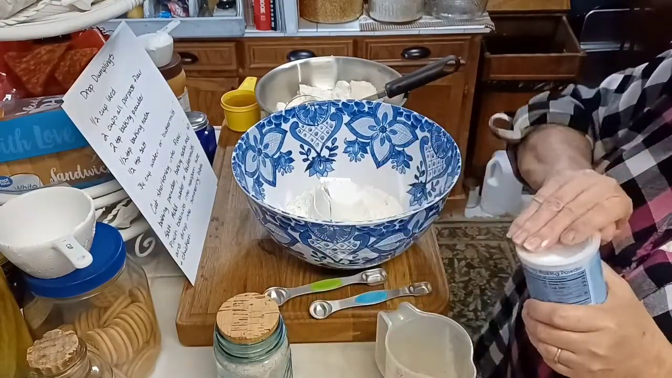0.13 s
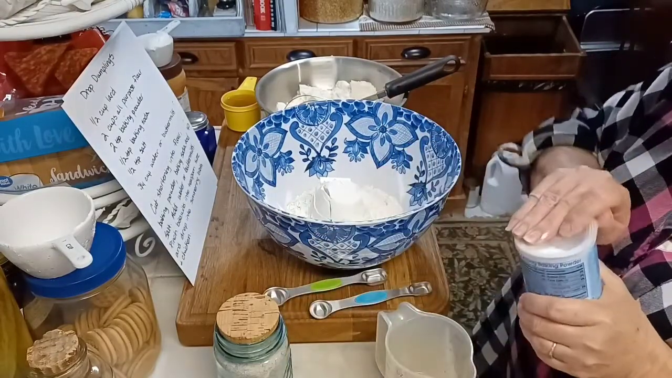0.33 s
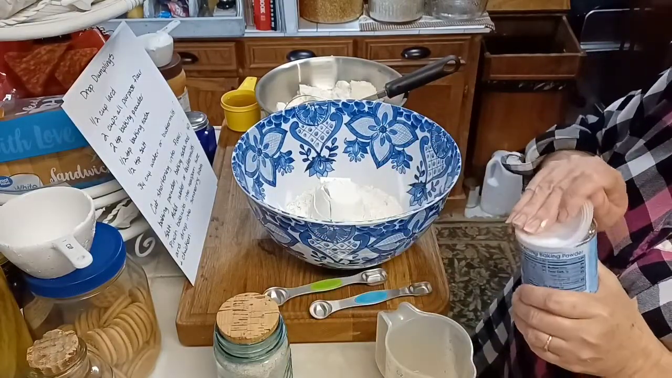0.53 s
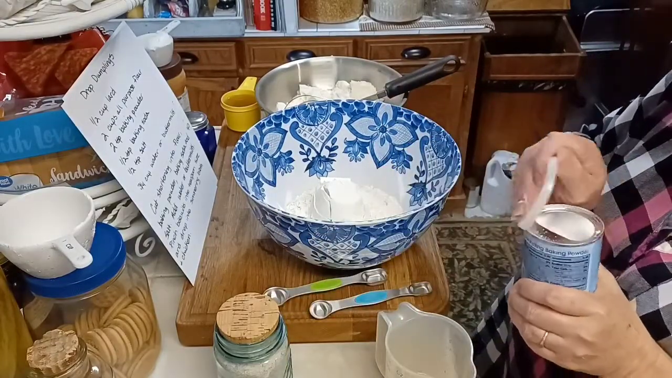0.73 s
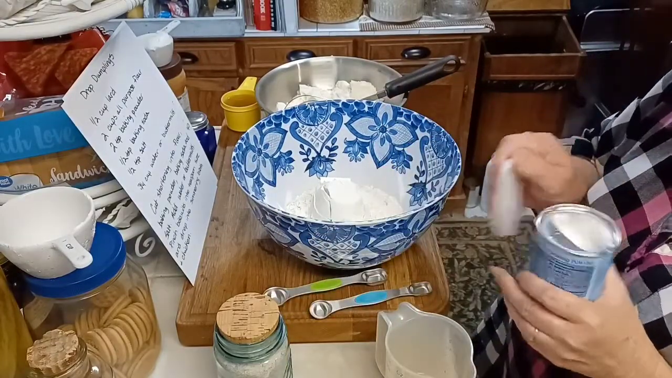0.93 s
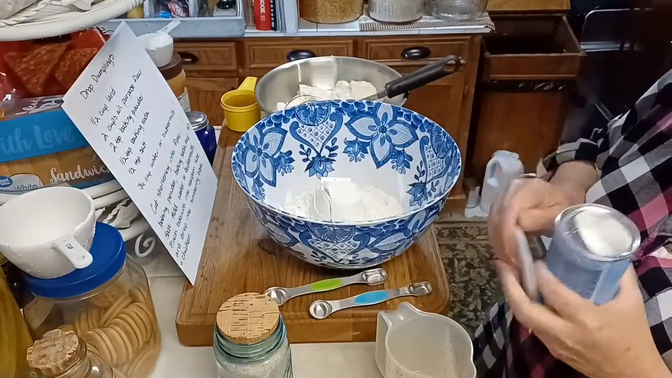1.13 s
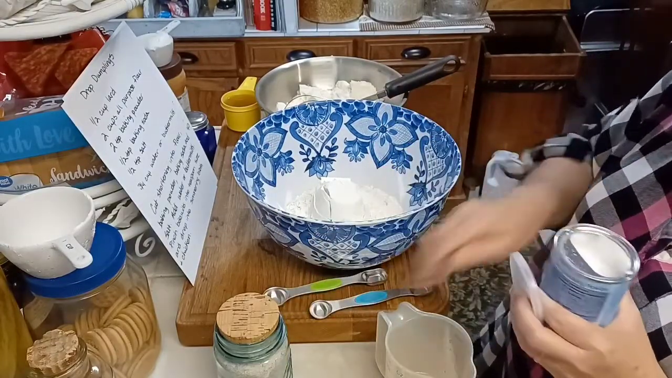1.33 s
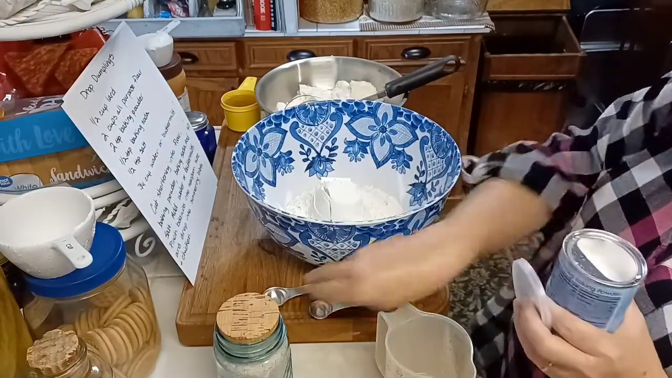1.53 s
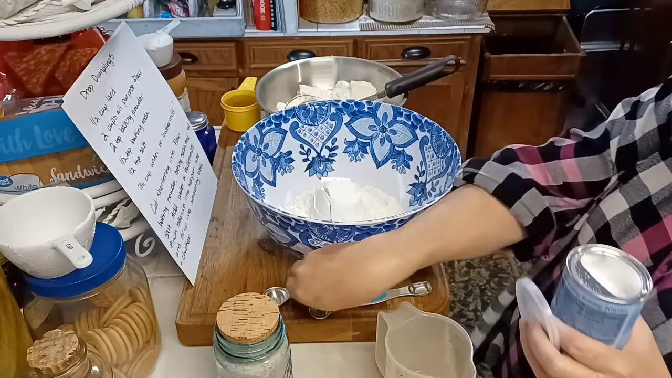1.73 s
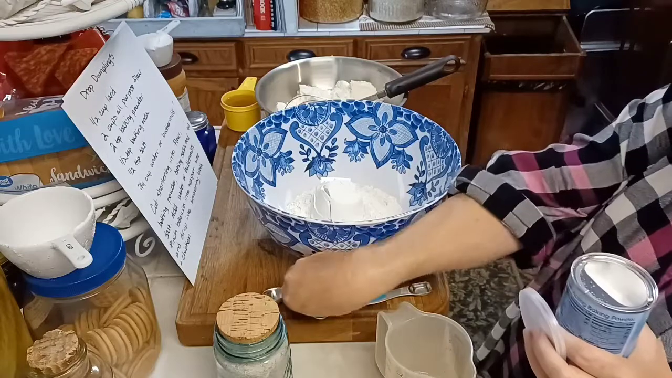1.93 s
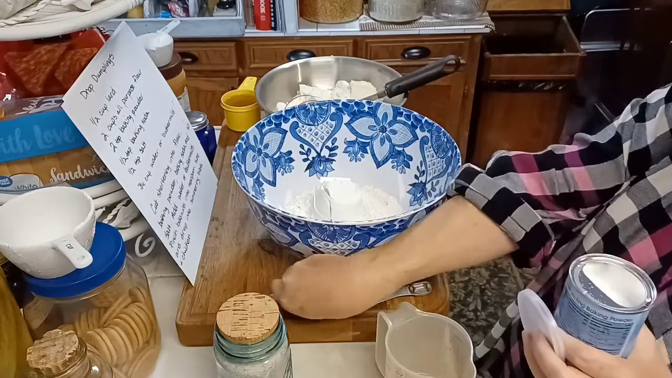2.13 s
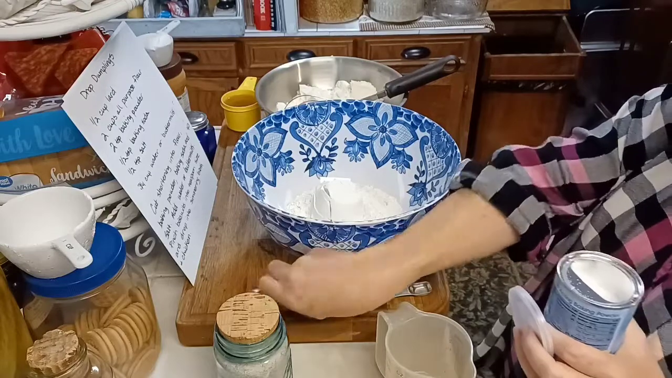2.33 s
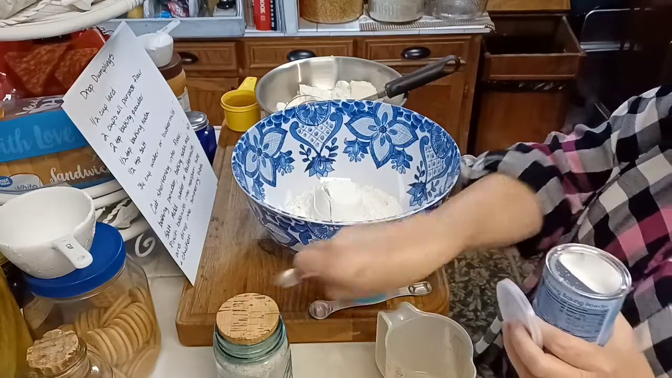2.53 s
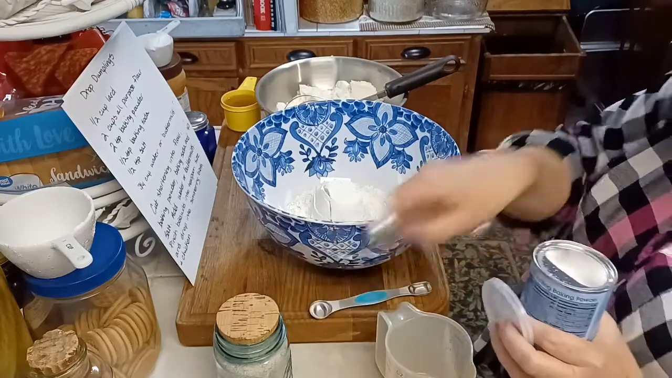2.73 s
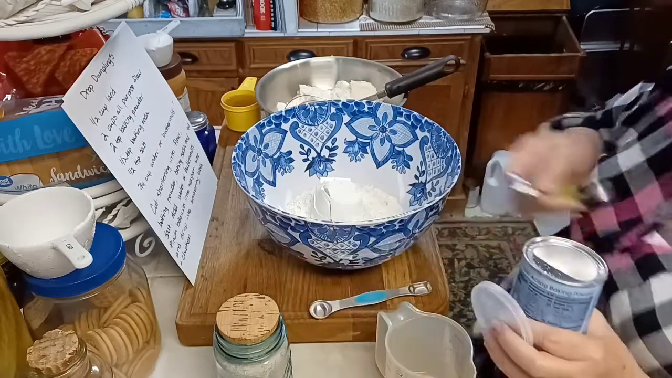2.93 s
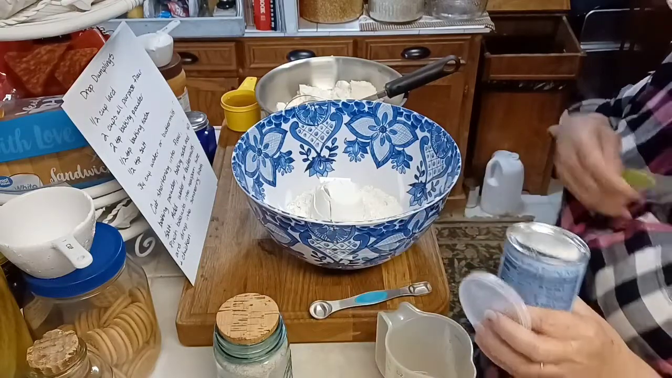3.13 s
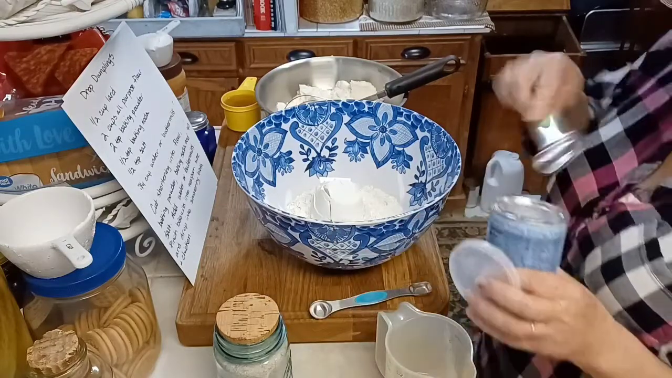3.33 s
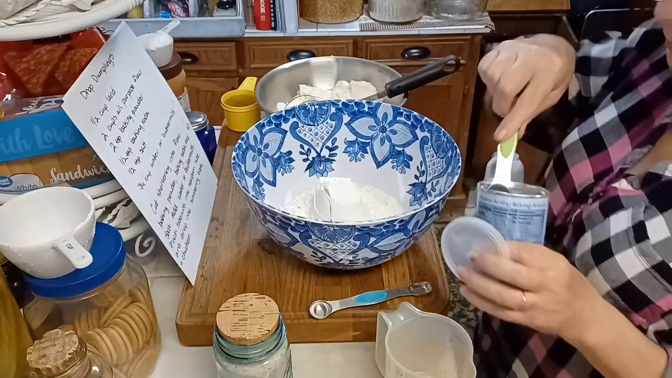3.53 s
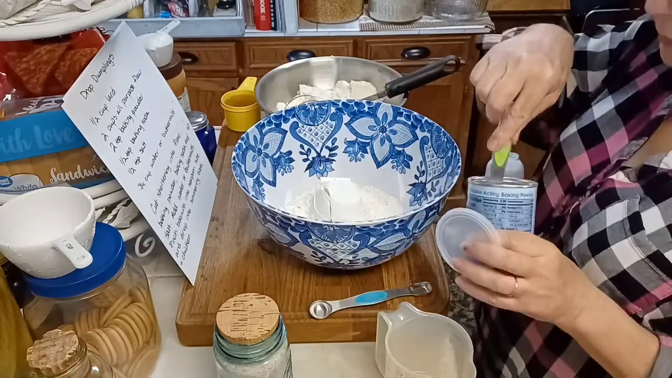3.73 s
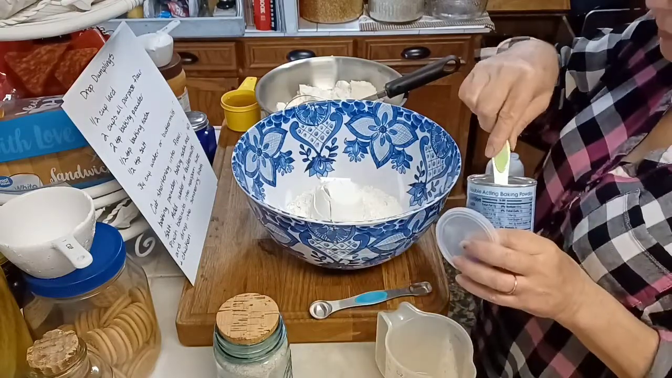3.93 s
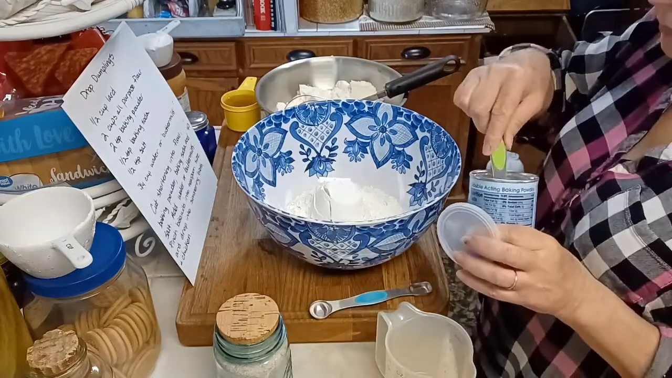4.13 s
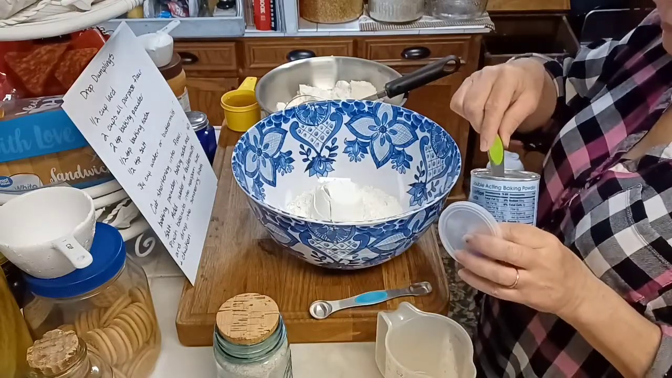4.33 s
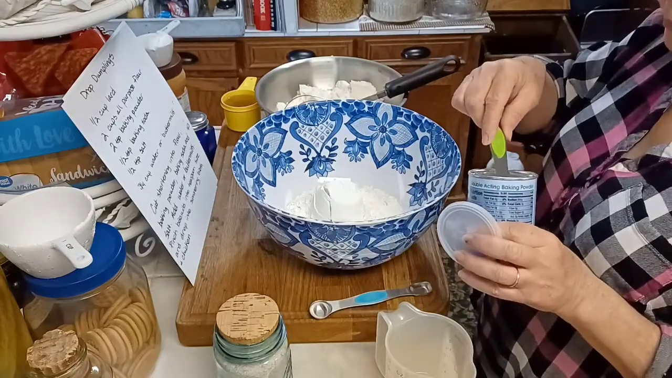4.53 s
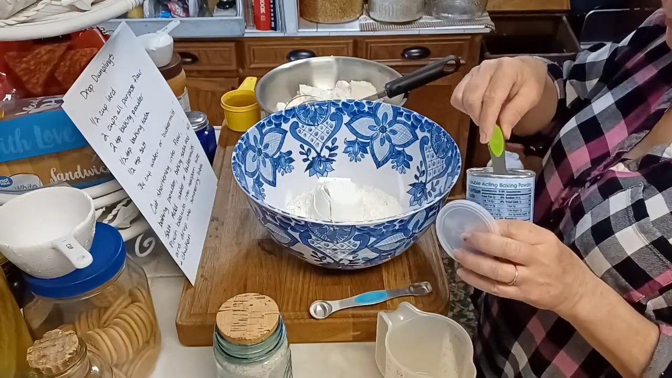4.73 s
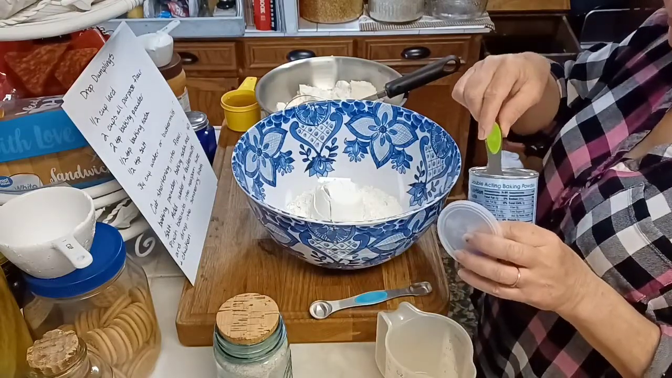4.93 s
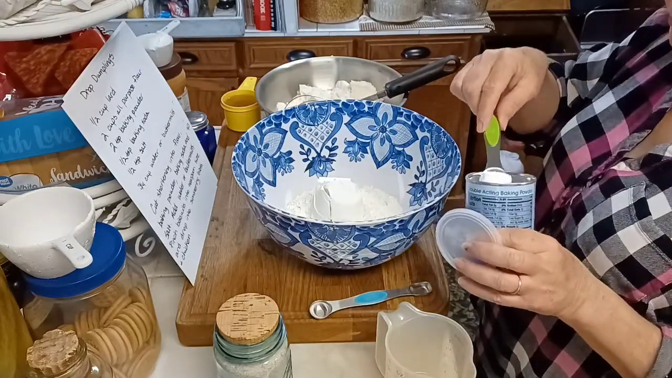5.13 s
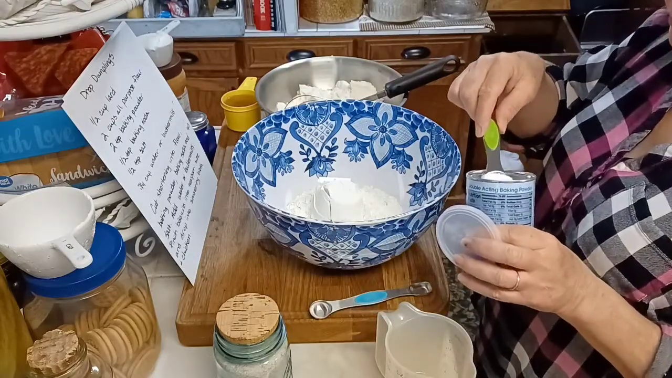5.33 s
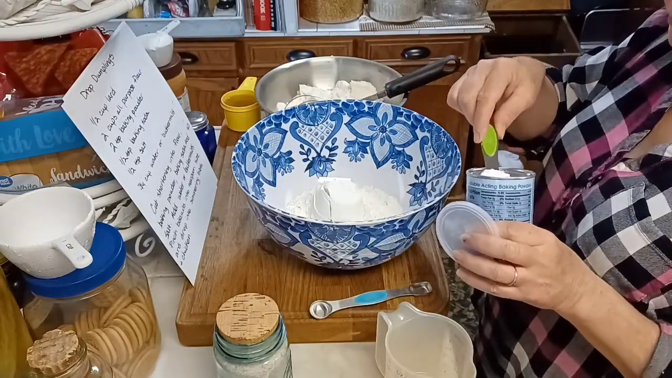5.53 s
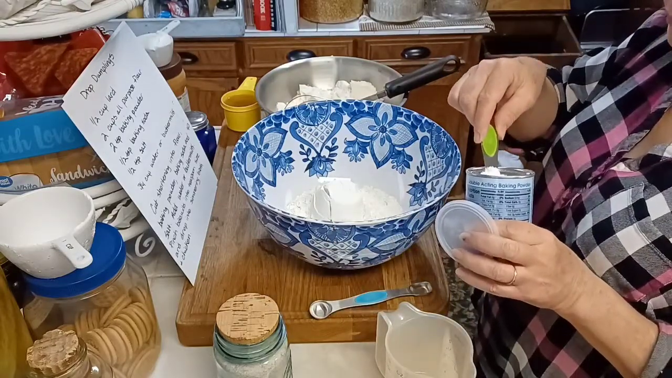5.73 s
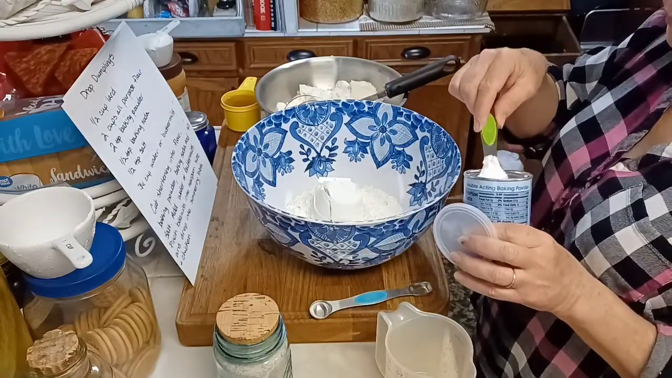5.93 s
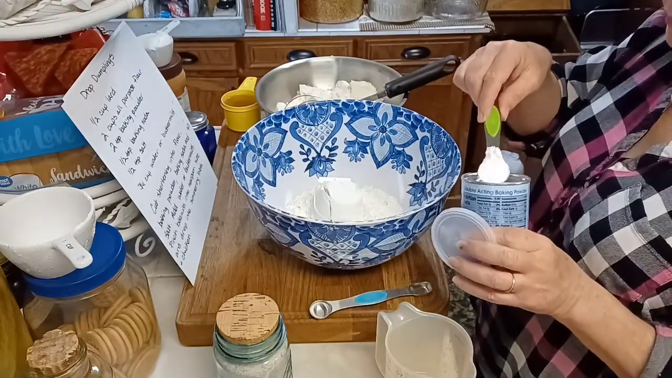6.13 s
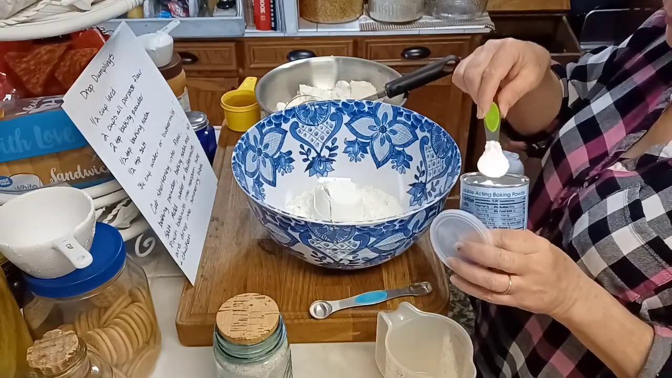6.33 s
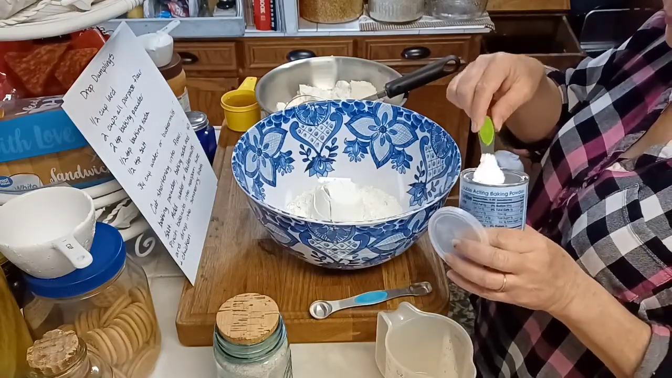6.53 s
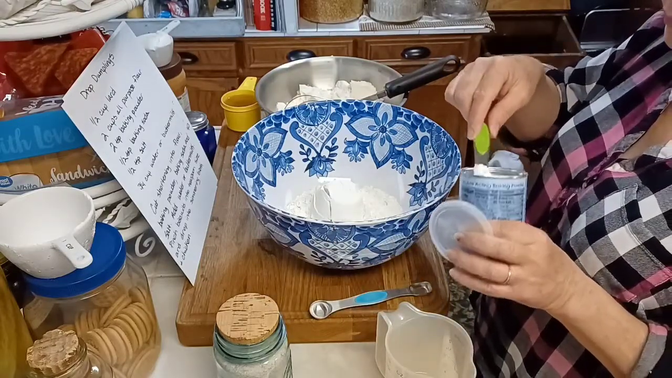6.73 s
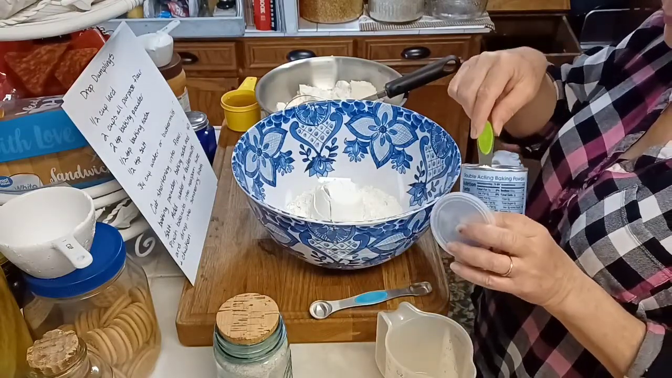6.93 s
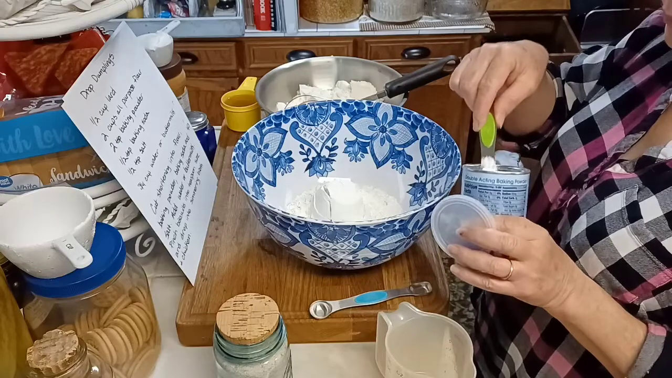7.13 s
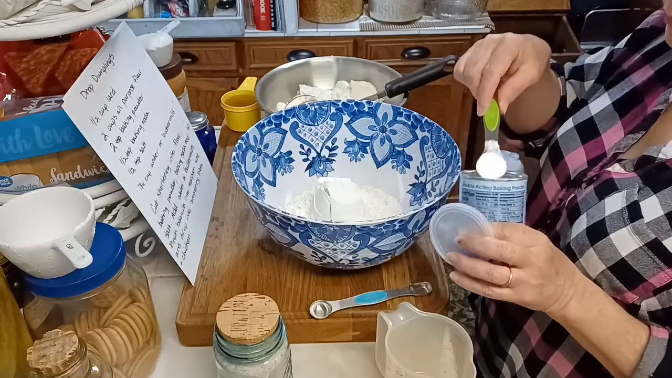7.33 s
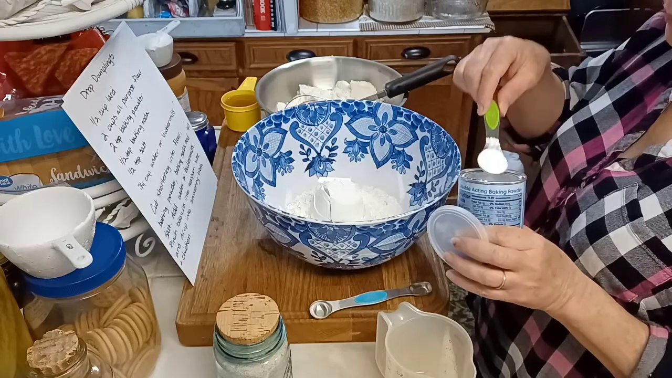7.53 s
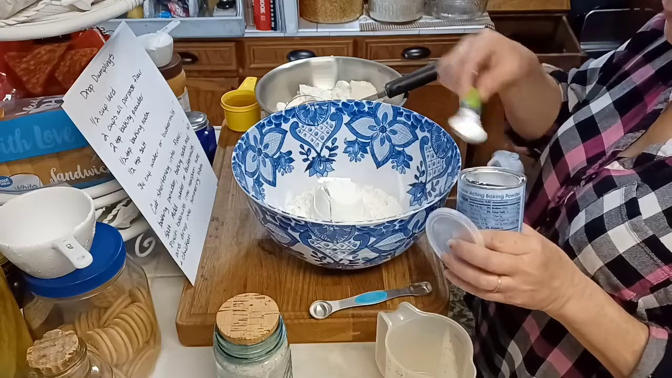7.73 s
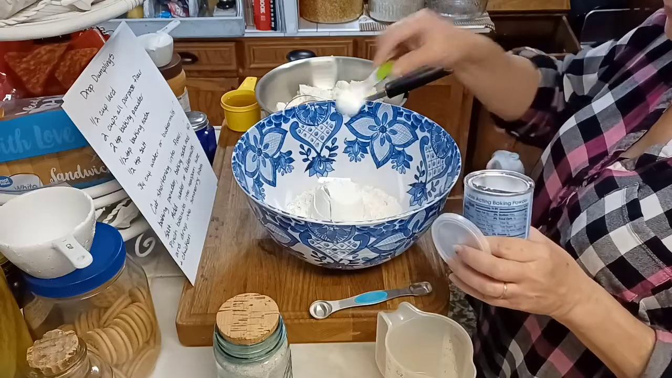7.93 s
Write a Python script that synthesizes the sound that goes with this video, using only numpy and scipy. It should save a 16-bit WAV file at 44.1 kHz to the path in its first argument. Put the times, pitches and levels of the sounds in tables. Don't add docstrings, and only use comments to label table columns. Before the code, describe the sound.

A low fridge hum and thin hiss lie under everything. Soft finger thuds lead to a rapid plastic lid pop. After a pause, metal spoons clatter sharply, bounce and land on wood. Then come small taps on a can, a firm rim strike, faint powder swishing, and short gritty scrapes with hollow, pitch-shifting knocks. Nearby stereo microphone, short bright kitchen reflections.

```python
import sys
import numpy as np
from scipy import signal
from scipy.fft import rfft, irfft
from scipy.io import wavfile
from scipy.ndimage import map_coordinates

SR = 44100
rng = np.random.default_rng(int(sys.argv[2]) if len(sys.argv) > 2 else 0)


def volts_from_db(level):
    exponent = np.asarray(level, float) / 20
    return 10 ** exponent


def materialize(psi):
    bounded = np.clip(np.atleast_2d(psi).T, -1, 1)
    quanta = np.round(bounded * 32767).astype(np.int16)
    wavfile.write(sys.argv[1], SR, quanta)


N = 356769


def unit(x):
    return x / np.sqrt(np.mean(x ** 2) + 1e-20)


def along(points, hz):
    f, v = np.transpose(points)
    return np.interp(np.log(hz + 1), np.log(f + 1), v)


def wobble(rate):
    knots = rng.standard_normal(int(N * rate / SR) + 4)
    return map_coordinates(knots, [np.arange(N) * rate / SR])


def body(spectrum, rings=(), base_db=0):
    f = np.fft.rfftfreq(8192, 1 / SR)
    power = volts_from_db(2 * (along(spectrum, f) + base_db))
    for hz, width, db in rings:
        power = power + volts_from_db(2 * db) / (1 + (2 * (f - hz) / width) ** 2) ** 2
    ceps = irfft(np.log(power + 1e-12) / 2)
    ceps[1:4096] *= 2
    ceps[4097:] = 0
    h = irfft(np.exp(rfft(ceps)))[:4096]
    return h / np.linalg.norm(h)


def through(x, h):
    return signal.fftconvolve(x, h if x.ndim == 1 else h[None], axes=-1)[..., :N]


def blend(pair, alike, hz):
    turn = np.arccos(np.clip(along(alike, hz), 0, 1)) / 2
    shared, apart = np.cos(turn) * pair[0], np.sin(turn) * pair[1]
    return np.array([shared + apart, shared - apart])


def noise(spectrum, alike, lag):
    f = np.fft.rfftfreq(N, 1 / SR)
    pair = blend(rfft(rng.standard_normal((2, N))), alike, f)
    pair = pair * np.exp(np.outer([-1j, 1j], np.pi * f * lag / SR))
    return unit(irfft(pair * volts_from_db(along(spectrum, f)), N))


# f/Hz, t60/s
KITCHEN_DECAY = [(200, 0.3), (1000, 0.19), (4000, 0.16), (8000, 0.16), (14000, 0.13)]
# f/Hz, likeness/0..1
ECHO_LIKENESS = [(200, 0.58), (400, 1), (700, 0.3), (1500, 0.14), (4000, 0.036)]
# f/Hz, phase/rad
JAR_SCATTER = [(500, .05), (1200, .5), (2500, 1.6), (6000, 2.1)]


def placed(x, lag, pan_db, wet_db):
    out, step, f = np.zeros((2, N + SR)), 2048, np.fft.rfftfreq(N, 1 / SR)
    for i in range(0, N, step):
        piece = x[i:i + step]
        if np.abs(piece).max() > 1e-6:
            hz, t, z = signal.stft(rng.standard_normal((2, SR // 4)), SR, nperseg=256)
            t60 = along(KITCHEN_DECAY, hz)[:, None]
            z = blend(z, ECHO_LIKENESS, hz[:, None]) * volts_from_db(-60 * t / t60) / np.sqrt(t60)
            tail = signal.istft(z, SR, nperseg=256)[1]
            wet = signal.fftconvolve(piece[None], tail / np.linalg.norm(tail[0]), axes=1)
            out[:, i + 90:i + 90 + wet.shape[1]] += wet
    ripple = map_coordinates(rng.standard_normal(64), [f / 450])
    twist = along(JAR_SCATTER, f) * ripple
    direct = irfft(rfft(x) * np.exp(np.outer([-1j, 1j], np.pi * f * lag / SR + twist / 2)), N)
    return (direct + volts_from_db(wet_db) * out[:, :N]) * volts_from_db([[pan_db / 2], [-pan_db / 2]])


def blows(times, dbs, contact_s):
    x, t = np.zeros(N + SR), np.arange(600) / SR
    for s, db in zip(times, dbs):
        chatter = rng.standard_normal(len(t)) * volts_from_db(-60 * t / contact_s)
        chatter[0] = 2.6
        x[round(s * SR):][:len(t)] += volts_from_db(db) * chatter
    return x[:N]


def struck(events, colour, gain_db, contact_s):
    s, db = np.transpose(events)
    return volts_from_db(gain_db) * through(blows(s, db, contact_s), colour)


def pings(events, attack_s):
    x, t = np.zeros(N + SR), np.arange(3000) / SR
    for s, db, hz, t60 in events:
        swing = volts_from_db(db - 60 * t / t60) * (1 - np.exp(-t / attack_s)) * np.sin(2 * np.pi * hz * t)
        x[round(s * SR):][:len(t)] += swing
    return x[:N]


def grains(lumpy_db, rate):
    return unit(rng.standard_normal(N) * volts_from_db(lumpy_db * wobble(rate) + 0.52 * wobble(45)))


def swells(rows, swell_db, attack_s, release_s):
    out = np.zeros((len(rows[0]) - 2, N))
    for s, length, db, *over_db in rows:
        knots = np.cumsum([s - attack_s, attack_s, length, release_s])
        i = np.arange(max(round(knots[0] * SR), 0), round(knots[-1] * SR))
        level = volts_from_db(db + np.interp(i / SR, knots, [-60, -swell_db, 0, -60]))
        out[:, i] += np.outer(volts_from_db([0, *over_db]), level)
    return out


# f/Hz, level/dB
FRIDGE_LINES = [(183.0, -71), (242.2, -66.5), (296.1, -75.5), (323.0, -74.5), (366.1, -80.5),
                (403.7, -85.5), (457.6, -83), (1674, -93)]
# f/Hz, level/dB
AIR_COLOUR = [(20, -48), (45, -35), (60, -21.5), (110, -14), (150, -14.5), (240, -8), (320, -10.5),
              (400, -15.5), (470, -13.5), (600, -22), (750, -23), (950, -31), (1500, -43.5), (2000, -77)]
# f/Hz, likeness/0..1
AIR_LIKENESS = [(30, 0.9), (150, 0.4), (300, 0.58), (1000, 0.23)]
# f/Hz, level/dB
HISS_COLOUR = [(710, -37), (1200, -5.5), (1460, -9.5), (1640, -1.5), (1750, -7.5), (2130, -11), (2510, -13),
               (3870, -16.5), (6800, -20.5), (7490, -16), (12900, -21), (16000, -18)]
# f/Hz, likeness/0..1
HISS_LIKENESS = [(1500, 0.14), (4000, 0.12), (12000, 0.1)]


def room_tone():
    t, hum = np.arange(N) / SR, 0
    for hz, db in FRIDGE_LINES:
        phase = 2 * np.pi * hz * t + 0.0022 * hz * wobble(9) + 0.0018 * hz * wobble(25)
        hum = hum + volts_from_db(db + 2.2 + 2.8 * wobble(11)) * np.sin([phase - .08, phase + .08])
    air = volts_from_db(-66 + 1.2 * wobble(2.2)) * noise(AIR_COLOUR, AIR_LIKENESS, lag=6)
    hiss = volts_from_db(-84 + 3.0 + 0.22 * wobble(0.85)) * noise(HISS_COLOUR, HISS_LIKENESS, lag=0)
    return (hum + air) * volts_from_db([[.4], [-.4]]) + hiss


# f/Hz, level/dB
FADING_COLOUR = [(2000, -40), (3200, -14), (4000, -0.5), (5000, -5), (7000, -8), (12000, -7), (15800, -10)]


def fading():
    level_db, t60_s = -63, .2
    decay = volts_from_db(level_db - 60 * np.arange(N) / SR / t60_s)
    return decay * noise(FADING_COLOUR, HISS_LIKENESS, lag=0)


# t/s, length/s, level/dB, brightness/dB
RUSTLES = [(.1, 0.34, -83.5, -7.5), (.78, 0.047, -77.5, -1), (.88, 0.036, -86, -1), (1.07, .11, -86.5, -4),
           (1.74, 0.066, -86.5, -4), (1.89, 0.098, -90, -3.5), (2.825, 0.027, -84.5, 15.5),
           (2.88, 0.03, -82, -1), (2.97, 0.082, -77.5, 0), (3.12, .14, -81, 1.5), (3.3, .08, -86.5, -3),
           (3.76, 0.044, -78.5, -5.5), (3.85, .05, -83, -8), (4.03, 0.023, -91.5, -11),
           (5.68, .04, -83, -12), (6.88, .06, -89, -3.5), (7.03, 0.019, -86, -3.5), (7.5, .12, -82, -20)]
# f/Hz, level/dB
SLEEVE_COLOUR = [(880, -30), (1500, -4.5), (3010, -11), (5000, -9), (6070, -6.5), (6760, -5.5), (8330, -1),
                 (9500, -10.5), (12400, -30.5), (20900, -120)]
# f/Hz, level/dB
CUFF_COLOUR = [(5290, -40.5), (9000, -13), (10300, -7.5), (11300, -2.5), (12500, -1.5), (15100, -9.5),
               (15800, -16.5)]


def hands():
    touches = swells(RUSTLES, swell_db=9.0, attack_s=0.31, release_s=0.16)
    dull, bright = touches * volts_from_db(-3) * grains(lumpy_db=2.5, rate=400)
    brush = through(dull, body(SLEEVE_COLOUR)) + through(bright, body(CUFF_COLOUR))
    return placed(brush, lag=11.0, pan_db=-2.5, wet_db=5)


# t/s, level/dB, f/Hz, click/dB
FINGER_THUDS = [(0.381, -42.5, 423, -28), (.40, -47, 490, -21), (.438, -45.5, 476, -20),
                (.458, -60, 610, -19), (0.573, -53, 720, -22), (1.159, -53, 1040, 1.5),
                (1.182, -50.5, 1080, -6), (1.938, -50.5, 700, -16), (1.96, -54, 744, -14)]


def finger_thuds():
    thuds, t = np.zeros(N + SR), np.arange(2000) / SR
    dull = [(150, -40.0), (1000, -27.5), (2500, -46.5), (6000, -45.5)]
    for s, db, hz, click_db in FINGER_THUDS:
        colour = body(dull, [(hz, 200, 0), (1850, 500, click_db - 6.0)])
        puff = rng.standard_normal(len(t)) * volts_from_db(db - 3 - 60 * t / .03) * (1 - np.exp(-t / .0004))
        thuds[round(s * SR):][:len(t)] += np.convolve(puff, colour[:800])[:len(t)]
    return placed(thuds[:N], lag=5.9, pan_db=0.0, wet_db=2.5)


# t/s, level/dB, f/Hz, t60/s
LID_JERKS = [
    (.6407, -17, 770, .008),
    (.6476, -22.5, 890, .016),
    (.651, -18.5, 900, .012),
    (.6602, -24, 895, .017),
    (.677, -34, 920, .016),
    (.687, -35, 900, .04),
]
# f/Hz, level/dB
LID_COLOUR = [(50, -47), (150, -21), (400, -5), (650, -3.5), (1200, 1.5), (2150, -11), (3000, -38.5)]
# t/s, level/dB
LIP_SNAPS = [
    (.631, -56),
    (.641, -45),
    (.6476, -44.5),
    (.6535, -38.5),
    (.659, -45.5),
]
# f/Hz, level/dB
LIP_COLOUR = [(1500, -4.5), (2300, -2.5), (3300, -7), (4500, -2.5), (6300, -10), (8300, -7.5),
              (11000, -14.5), (15500, -16)]


def lid():
    plastic = body(LID_COLOUR, [(906, 58, 13), (980, 48, 5.4)])
    pop = volts_from_db(3.5) * pings(LID_JERKS, attack_s=0.0016)
    pop += struck(np.array(LID_JERKS)[:, :2], plastic, gain_db=-10.0, contact_s=0.0066)
    snap = struck(LIP_SNAPS, body(LIP_COLOUR), gain_db=-3.5, contact_s=0.01)
    return placed(pop, lag=7.3, pan_db=-0.5, wet_db=-4.0) + placed(snap, lag=5.9, pan_db=0.0, wet_db=2.5)


# t/s, level/dB, f/Hz, t60/s
SPOON_TINKS = [
    (1.903, -81, 7360, 0.11),
    (1.912, -82, 8050, 0.23),
    (1.942, -83, 6650, .2),
    (2.2342, -15.5, 2150, 0.014),
]
# t/s, level/dB
CLACKS = [(2.156, -9.5), (2.1595, -14), (2.1664, -17), (2.1704, -15.5), (2.176, -20), (2.1833, -20),
          (2.1935, -21.5), (2.203, -32), (2.214, -31.5)]
# f/Hz, level/dB
CLACK_COLOUR = [(150, -36.5), (700, -24.5), (1300, -27), (1900, -15.5), (3000, -8.5), (4500, -10),
                (6400, -16), (11500, -13.5), (15500, -24)]
# f/Hz, width/Hz, level/dB
CLACK_MODES = [(2148, 90, -9.5), (2627, 31, -7), (2789, 87, -2), (3135, 45, 5), (3540, 50, -0.5),
               (3613, 37, 1.5), (3938, 75, -1), (4180, 70, 0), (5030, 90, -8.5), (6330, 83, -11),
               (7693, 120, -7.5), (8210, 90, -11), (10900, 100, -10.5), (11400, 150, -8.5)]
# t/s, level/dB
REBOUNDS = [(2.2338, -12), (2.2365, -13), (2.238, -19), (2.2454, -28), (2.2525, -28.5), (2.262, -30)]
# f/Hz, level/dB
REBOUND_COLOUR = [(150, -32.5), (450, -24.5), (1500, -31.5), (2000, -13), (2900, -11.5), (4500, -4),
                  (5500, -15.5), (8500, -16.5), (15500, -23)]
# f/Hz, width/Hz, level/dB
REBOUND_MODES = [(2100, 200, -6), (2400, 150, -11.5), (3162, 120, -3.5), (3500, 80, 2), (3935, 70, 0),
                 (4360, 89, 0), (4495, 70, 0.5), (4800, 77, -3.5), (5194, 90, -10), (7570, 200, -11.5),
                 (8540, 150, -13), (11260, 200, -14)]
# t/s, level/dB
SETTLING = [(2.3351, -35), (2.345, -48), (2.355, -48)]
# f/Hz, level/dB
SETTLING_COLOUR = [(1200, -30.5), (2300, -13), (3000, -4), (3500, 3), (4200, -14), (5500, -19.5),
                   (9000, -29.5), (15500, -35)]
# t/s, level/dB
NAIL_FLICKS = [(2.682, -62), (3.257, -66.5)]
# f/Hz, level/dB
FLICK_COLOUR = [(2000, -29.5), (5000, -7), (9500, -1), (12500, 0), (16000, -4)]


def spoons():
    bunch = body(CLACK_COLOUR, CLACK_MODES, base_db=0.5)
    bounced = body(REBOUND_COLOUR, REBOUND_MODES, base_db=-1.5)
    steel = struck(CLACKS, bunch, gain_db=-8.5, contact_s=0.017)
    steel += struck(REBOUNDS, bounced, gain_db=-2.5, contact_s=0.0019)
    steel += struck(SETTLING, body(SETTLING_COLOUR), gain_db=-6.5, contact_s=0.059)
    steel += struck(NAIL_FLICKS, body(FLICK_COLOUR), gain_db=-3, contact_s=.008)
    steel += pings(SPOON_TINKS, attack_s=0.0013)
    return placed(steel, lag=-0.29, pan_db=0.16, wet_db=1.0)


# t/s, level/dB
BOARD_THUMPS = [
    (2.156, -37),
    (2.2338, -46),
    (2.4297, -34.5),
    (2.442, -31.5),
    (3.447, -54),
    (3.583, -51),
    (4.661, -39),
]
# f/Hz, level/dB
BOARD_COLOUR = [(40, -42), (150, -14), (300, -2.5), (500, -5), (660, -8), (800, -13), (1300, -14),
                (2000, -21), (3000, -51)]
# t/s, level/dB, f/Hz, t60/s
BOARD_PINGS = [(2.4296, -34.5, 495, .03), (2.431, -39.5, 650, .03), (2.442, -34.5, 303, .05),
               (2.443, -37.5, 630, .04), (2.4485, -39, 510, .04)]


def board():
    thumps = struck(BOARD_THUMPS, body(BOARD_COLOUR), gain_db=2.0, contact_s=0.0034)
    return placed(thumps + pings(BOARD_PINGS, attack_s=0.0011), lag=-2, pan_db=-1.5, wet_db=4)


# t/s, level/dB
DROPS = [
    (2.4297, -10.5),
    (2.432, -19),
    (2.4424, -19.5),
    (2.4484, -20.5),
]
# f/Hz, level/dB
DROP_COLOUR = [(700, -40), (1050, -23), (2000, -16.5), (2900, -25.5), (4500, -22), (5400, -14.5),
               (7100, -28.5), (9000, -38), (11200, -29.5), (13500, -29.5), (15500, -44.5)]
# f/Hz, width/Hz, level/dB
DROP_MODES = [(2127, 200, -19), (3260, 70, -0.5), (3490, 48, 3.5), (3610, 80, -1), (4118, 650, -12.5),
              (6090, 50, 1.5), (6174, 72, 0.5), (8050, 300, -9), (10200, 220, -4.5), (11610, 210, -14.5),
              (12220, 450, -8), (14600, 250, -7)]


def dropped_spoon():
    drop = struck(DROPS, body(DROP_COLOUR, DROP_MODES), gain_db=-4, contact_s=0.008)
    return placed(drop, lag=-0.497, pan_db=-0.5, wet_db=0.5)


# t/s, f/Hz
SPOON_DEPTH = [(3.45, 1240), (3.59, 1410), (4.72, 1370), (4.77, 1700), (4.881, 1315), (5.42, 1190),
               (5.58, 1388), (5.8, 1373), (6.07, 1150), (6.16, 1284), (6.52, 1300), (7.1, 1640),
               (7.22, 1350), (7.26, 1185), (7.37, 1350)]


def cavity_hz():
    return np.interp(np.arange(N) / SR, *np.transpose(SPOON_DEPTH))


# t/s, length/s, wall level/dB, cavity over wall/dB, grit over wall/dB
HARD_PUSHES = [(3.505, 0.0205, -48, -3, -11), (3.580, 0.0027, -44, -3.5, -13.5),
               (4.86, 0.03, -62.5, 3, -16), (5.49, 0.05, -59.5, -0.5, -18), (5.875, 0.048, -61.5, 8, -23),
               (6.03, 0.034, -66.5, 0, -16), (7.13, 0.035, -57, 2, -7), (7.185, 0.03, -49, 9, -10)]
# t/s, length/s, wall level/dB, cavity over wall/dB, grit over wall/dB
SLOW_DRAGS = [(3.455, 0.054, -59, -1.5, -4.5), (4.71, 0.077, -69.5, 8, -13.5),
              (5.394, 0.04, -70.5, 7.5, -13), (5.56, 0.042, -69.5, 1.5, -7.5), (5.793, 0.078, -73, 8, -15),
              (5.94, 0.045, -68, 7, -12.5), (5.995, 0.038, -74.5, 5, -10), (6.055, 0.036, -70.5, 3, -13),
              (6.105, 0.03, -62.5, 4.5, -9), (6.14, 0.044, -64.5, 7.5, -3.5),
              (7.235, 0.046, -56.5, 4, -9.5), (7.295, 0.061, -59.5, 6, -7.5)]
# t/s, level/dB, brightness/dB
WALL_TAPS = [(3.4466, -40, -13), (3.5754, -55, -21.5), (3.5829, -48.5, -22), (4.8833, -48, -25.5),
             (5.3941, -44.5, -31), (6.133, -46.5, -12), (6.1676, -47, -22), (6.5186, -39, -20.5),
             (6.5306, -45, -13.5)]
# f/Hz, level/dB
EDGE_COLOUR = [(1500, -27.5), (2300, -20), (3000, -9), (4000, -10), (5200, -8.5), (6300, -11.5),
               (8600, -12), (10000, -28), (13000, -47)]
# f/Hz, width/Hz, level/dB
EDGE_MODES = [(2360, 250, -3.5), (3550, 260, -3.5), (4280, 300, -4), (4580, 160, 0), (4896, 200, -4),
              (5400, 280, -2), (7570, 230, -2), (7940, 300, -17)]
# f/Hz, level/dB
WALL_COLOUR = [(1500, -40.5), (2300, -17.5), (2900, -15), (3500, -6.5), (5200, -11.5), (6100, -17),
               (7000, -13), (8600, -16), (10000, -26), (13000, -45.5)]
# f/Hz, width/Hz, level/dB
WALL_MODES = [(3410, 440, -7), (4000, 210, -4.5), (4398, 460, -1), (4820, 410, -6.5), (7680, 400, -5.5)]
# t/s, length/s, level/dB
RIM_GRINDS = [(3.508, 0.014, -62), (4.71, 0.063, -70.5), (4.85, 0.056, -70), (5.5, 0.064, -74.5),
              (6.14, 0.04, -61.5), (6.52, .015, -68), (7.19, 0.036, -56.5), (7.25, 0.11, -60.5)]
# f/Hz, level/dB
RIM_COLOUR = [(1500, -32.5), (2100, -4), (2700, 3.5), (3300, 3.5), (4000, -20), (6000, -42.5)]
# f/Hz, level/dB
GRIT_COLOUR = [(5290, -38.5), (9000, -14), (9910, -8), (11900, -1), (12200, 1.5), (12800, 0.5), (13600, -6),
               (15800, -12)]
# f/Hz, width/Hz, level/dB
CAVITY_MODES = [(1010, 150, 0), (1156, 220, 6.5), (1300, 353, 3), (1383, 390, 2.5), (1700, 260, 12)]
# t/s, level/dB
DIGS = [
    (4.6582, -27.5),
    (4.6605, -37.5),
    (4.6684, -42),
    (4.677, -42),
]
# f/Hz, level/dB
DIG_COLOUR = [(500, -39), (900, -18), (1200, -5.5), (1900, -6.5), (2800, -5), (4500, -10), (7000, -14),
              (9000, -15), (15500, -15)]
# f/Hz, width/Hz, level/dB
DIG_MODES = [(1230, 206, -2), (1900, 200, 0), (2770, 150, -2), (3400, 210, -3.5), (5360, 210, -9),
             (8980, 360, -12.5), (13600, 300, -13)]


def can_scrape():
    rub, boom, grit = (swells(HARD_PUSHES, swell_db=8, attack_s=.07, release_s=.08)
                       + swells(SLOW_DRAGS, swell_db=-2, attack_s=.03, release_s=0.074))
    s, db, bright_db = np.transpose(WALL_TAPS)
    slips = grains(lumpy_db=2.5, rate=550)

    push = volts_from_db(-3.5) * rub * slips + blows(s, db - 7.0, contact_s=0.0124)
    early = np.arange(N) < 4 * SR
    sound = through(push * early, body(EDGE_COLOUR, EDGE_MODES))
    sound += through(push * ~early, body(WALL_COLOUR, WALL_MODES, base_db=2.0))

    grind = swells(RIM_GRINDS, swell_db=5, attack_s=0.057, release_s=0.03)[0]
    sound += through(grind * slips, body(RIM_COLOUR))
    bright_taps = blows(s, db + bright_db - 0.5, contact_s=.006)
    sound += through(grit * slips + bright_taps, body(GRIT_COLOUR))

    hz, centres = cavity_hz(), np.array(CAVITY_MODES)[:, 0]
    drive = volts_from_db(-8) * boom * slips
    hollow = [(200, -45), (350, -10), (700, -38), (950, -12), (1900, -4.5), (2300, -42.5)]
    for k, ring in enumerate(CAVITY_MODES):
        share = np.interp(hz, centres, np.arange(len(centres)) == k)
        sound += through(drive * np.sqrt(share), body(hollow, [ring, (1840, 220, -6)]))

    rim = body(DIG_COLOUR, DIG_MODES, base_db=-3.5)
    sound += struck(DIGS, rim, gain_db=-8.0, contact_s=0.027)
    return placed(sound, lag=4.87, pan_db=-0.64, wet_db=3.0)


# t/s, level/dB, t60/s
AIR_KNOCKS = [(3.4459, -38.5, 0.019), (3.497, -48, 0.048), (3.521, -46.5, 0.059), (3.547, -50, 0.036),
              (3.584, -41.5, 0.04), (4.885, -54, .015), (4.8947, -46, 0.038), (5.395, -52, 0.025),
              (5.492, -58.5, 0.021), (5.5627, -61, .03), (5.5708, -53.5, .025), (5.787, -50, 0.015),
              (5.8114, -47.5, 0.014), (5.8852, -51.5, .015), (5.908, -49, .015), (5.9214, -49, .02),
              (5.94, -47.5, .02), (6.105, -52, 0.021), (6.1341, -46, .015), (6.164, -48, 0.024),
              (6.169, -37.5, 0.032), (6.184, -47, 0.018), (6.192, -49, 0.014), (6.5174, -31.5, 0.016),
              (6.530, -36, 0.015), (6.538, -48.5, 0.014), (6.546, -42, 0.013), (6.57, -50, .012),
              (7.184, -45, .015), (7.1956, -41, .015), (7.202, -40, 0.017), (7.217, -41, 0.0082),
              (7.231, -40, 0.013), (7.2567, -39, 0.017), (7.2945, -47, .014), (7.318, -36.5, 0.015),
              (7.33, -45, 0.013), (7.371, -37, 0.013)]
# t/s, level/dB, f/Hz, t60/s
BARE_WALL_PINGS = [(6.518, -50.5, 3890, 0.088), (6.518, -49, 4770, .03), (6.519, -67.5, 7720, 0.036),
                   (6.531, -59, 3900, .06), (6.531, -56, 4650, .04)]


def can_knocks():
    hz = cavity_hz()
    tuned = [(s, db, hz[round(s * SR)], t60) for s, db, t60 in AIR_KNOCKS]
    knocks = volts_from_db(2.5) * pings(tuned, attack_s=0.00069) + pings(BARE_WALL_PINGS, attack_s=0.00055)
    return placed(knocks, lag=4.5, pan_db=2.5, wet_db=-1.0)


# t/s, length/s, level/dB, f/Hz
SWIRLS = [
    (4.278, 0.1, -85.5, 3400),
    (5.156, 0.12, -91, 3943),
]


def swirl():
    s, length, db, centre_hz = np.transpose(SWIRLS)
    level, = swells(np.array(SWIRLS)[:, :3], swell_db=4.0, attack_s=.2, release_s=.8)
    hz = np.interp(np.arange(N) / SR, [s[0] + .4, s[1] - .1], centre_hz)
    hz = hz + 90 * wobble(9)
    band = through(grains(lumpy_db=-0.5, rate=190), body([(30, -3.0), (250, -3.5), (700, -22.5)]))
    carrier = np.sin(2 * np.pi * np.cumsum(hz) / SR)
    return placed(level * band * carrier, lag=5.6, pan_db=0.4, wet_db=7.5)


def scene():
    still = room_tone() + fading() + hands()
    opening = finger_thuds() + lid()
    steel = spoons() + board() + dropped_spoon()
    return still + opening + steel + can_scrape() + can_knocks() + swirl()


def roll_off(x):
    return signal.sosfilt(signal.butter(12, 16370, fs=SR, output="sos"), x)


def record(dry):
    top_hz = 15780
    mix = irfft(rfft(dry) * (np.fft.rfftfreq(N, 1 / SR) < top_hz), N)
    return roll_off(mix)


dry = scene()
out = record(dry)
materialize(out)
```